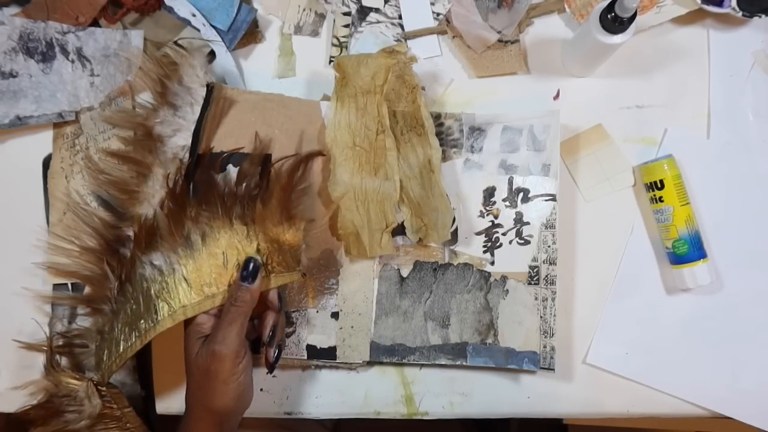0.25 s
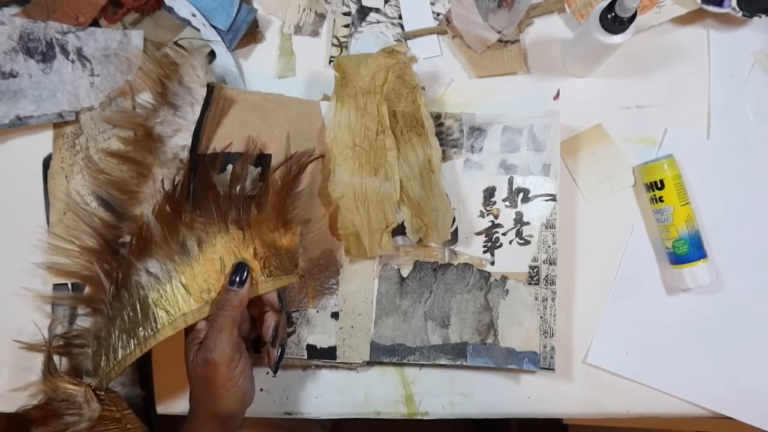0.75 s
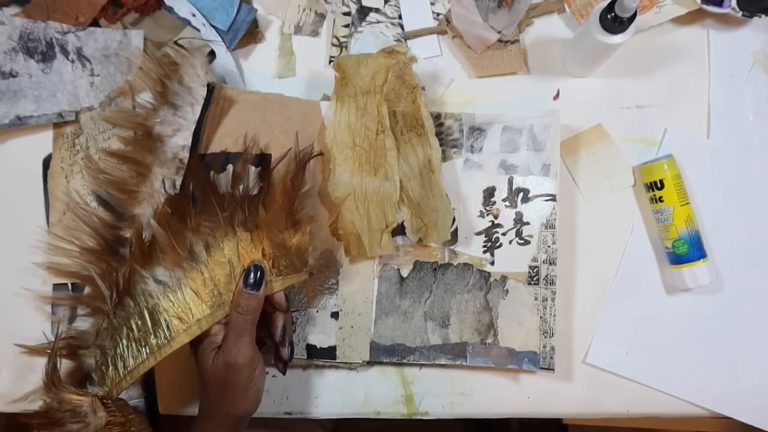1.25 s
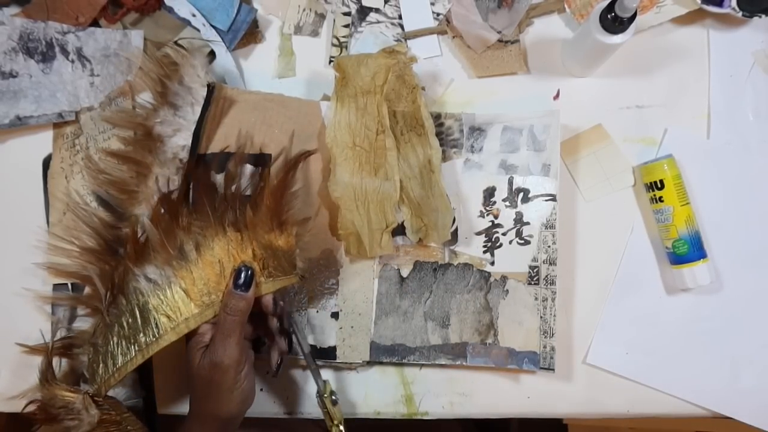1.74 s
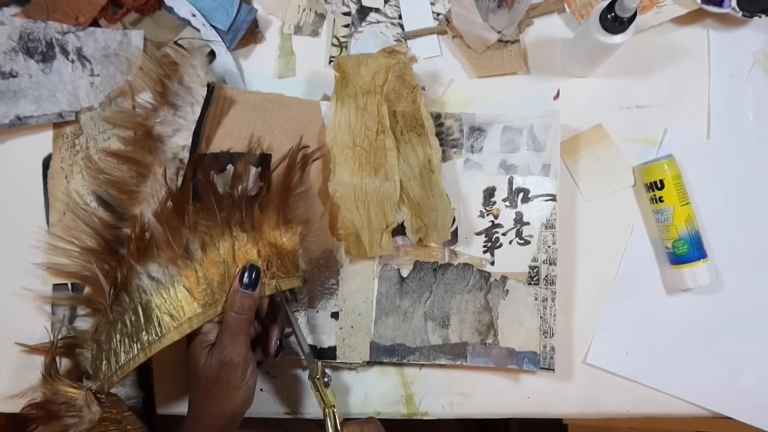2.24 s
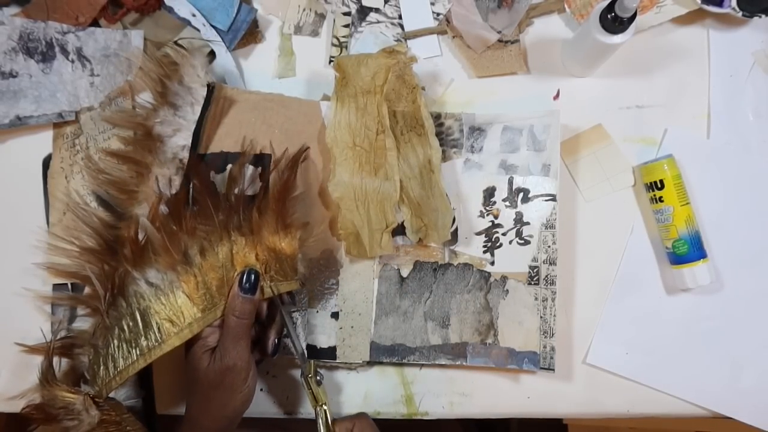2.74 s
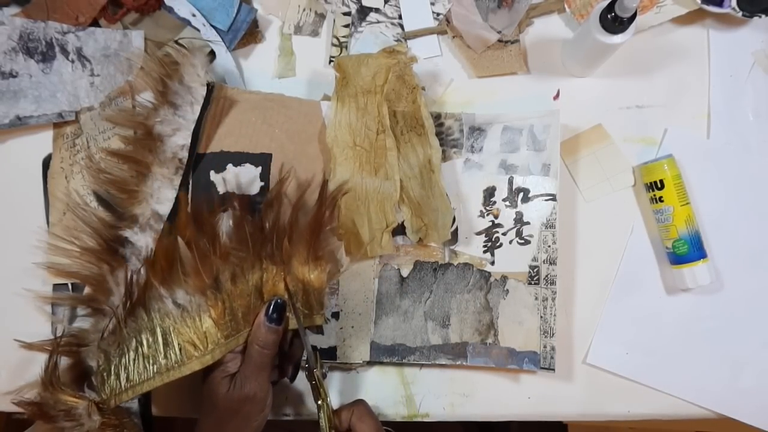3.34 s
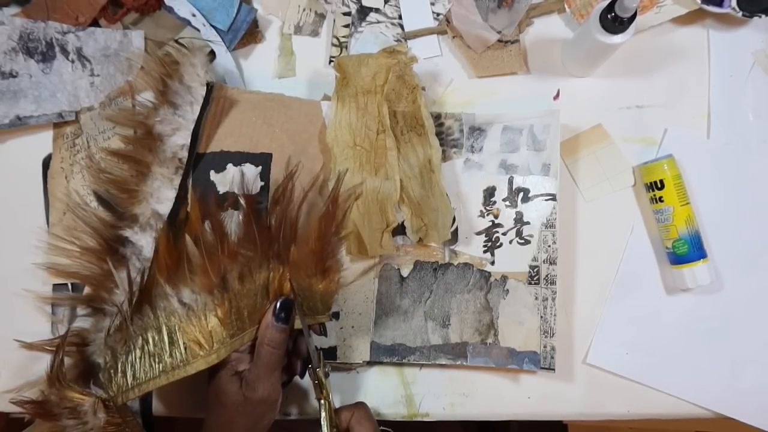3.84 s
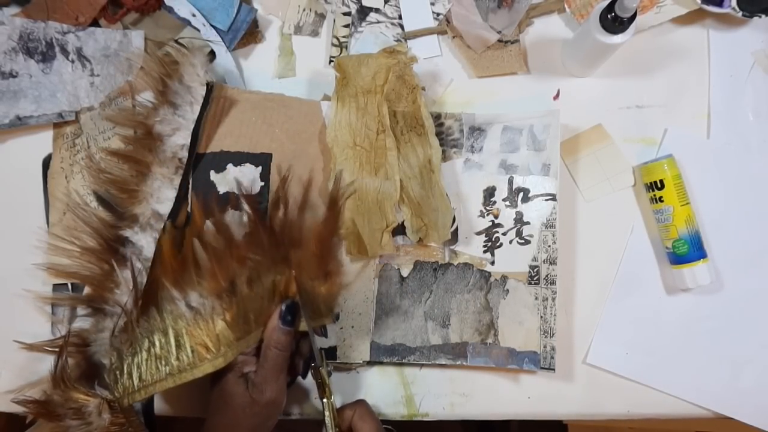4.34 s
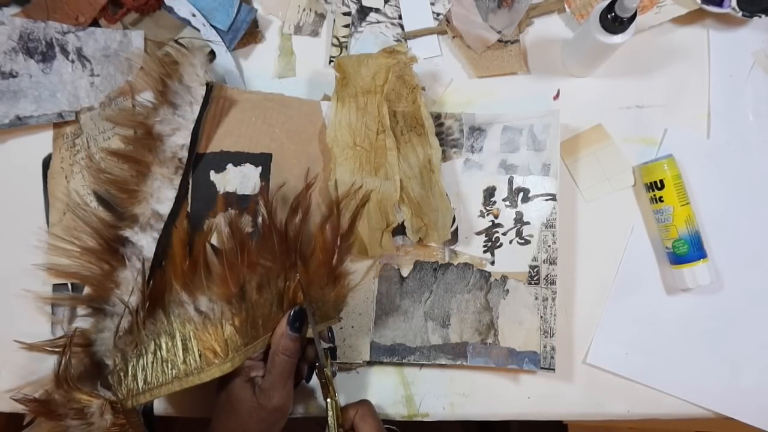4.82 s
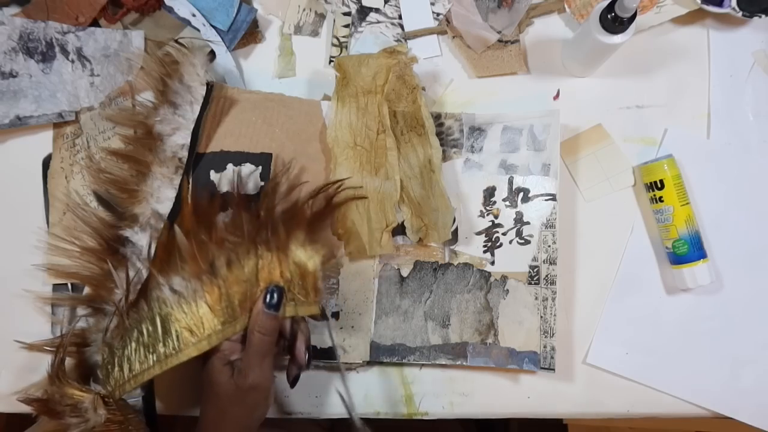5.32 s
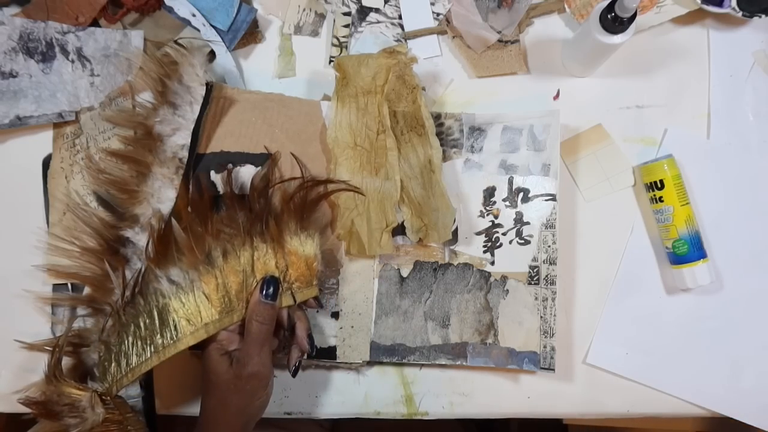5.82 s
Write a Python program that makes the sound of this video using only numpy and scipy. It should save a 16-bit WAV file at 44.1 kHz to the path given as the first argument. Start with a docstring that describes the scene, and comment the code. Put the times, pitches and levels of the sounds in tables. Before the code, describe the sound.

Scissors are picked out of clutter to the left, with a busy dry rattle, paper scrapes and light table knocks fading within a second. After a near-quiet gap, small steel ticks, a brief blade swish and soft handle clicks sound at centre as feather trim is cut. Finally the scissors drop at left with a loud woody clunk and short clatter. Steady low hum and faint hiss, close stereo microphones, small dry room.

```python
"""Clutter rattles at once on a craft table, to the left, as scissors are picked out over a mains hum and hiss.
Then straight below the microphones they snip a strip of feather trim, and are dropped back to the left.
Hum is sines; hiss, dragging and sliding are coloured noise; rattles are short noise bursts.
Table and handles are struck sets of modes; steel ticks are rough sines with a click. A faint room follows."""
import sys
import numpy as np
from scipy import signal
from scipy.fft import rfft, irfft, next_fast_len
from scipy.io import wavfile
from scipy.ndimage import uniform_filter1d

SR = 44100
rng = np.random.default_rng(int(sys.argv[2]) if len(sys.argv) > 2 else 0)


def transcribe(u):
    """Save the signal u as a 16-bit wav file named by the first command-line argument.

    u: samples, shape (n,) or (channels, n), limited to [-1, 1]; the rate is SR.
    q: integer samples, one column per channel.
    """
    v = np.clip(np.atleast_2d(u).T, -1, 1)
    q = np.round(v * 32767).astype(np.int16)
    wavfile.write(sys.argv[1], SR, q)


N = 267863  # samples

# Mains hum. Each row: frequency in Hz, mean rms level in dB.
HUM_TONES = [(120.0, -43), (430, -69)]
# Colour of the room hiss. Each row: frequency in Hz, relative density in dB per Hz.
HISS_COLOUR = [(20, -32), (40, -12.5), (65, -14.5), (95, -13), (146, -12.5), (200, -15), (301, -14.5),
               (434, -17.5), (527, -20.5), (1030, -23.5), (2500, -29), (5850, -36), (10000, -44.5),
               (14000, -50.5), (16000, -62)]
# How alike the hiss is at both microphones. Each row: frequency in Hz, left-right correlation (-1 to 1).
HISS_LIKENESS = [(60, 1), (130, 0.64), (290, -0.33), (640, -0.2), (1410, 0.05), (3100, 0.4), (6820, 0.44)]
# Decay of the room. Each row: frequency in Hz, time to fall 60 dB in seconds.
ROOM_DECAY = [(200, 0.42), (1000, 0.22), (4000, 0.28), (12000, 0.093)]
# Lead of the left microphone for the clutter. Each row: frequency in Hz, left over right in dB.
LEFT_LEAD = [(100, -1), (1300, 1.5), (2400, 3.5), (8000, 2)]
# Colour of dragging over paper. Each row: frequency in Hz, relative density in dB per Hz.
PAPER_COLOUR = [(80, -50), (400, -26), (1100, 1), (1900, 1.5), (2700, -5.5), (4500, -13), (9000, -22),
                (16000, -44)]
# Colour of the rumble in the table. Each row: frequency in Hz, relative density in dB per Hz.
RUMBLE_COLOUR = [(60, -4), (150, 2), (350, 4), (600, -4.5), (1200, -54.5)]
# Things dragged over paper. Each row is a stroke: start in seconds, length in seconds, level in dB,
# treble tilt in dB per octave (held within -6 and 6), level of the table rumble in dB.
DRAG_STROKES = [(.009, .02, -52, -8, -45), (.045, 0.12, -35, -5, -41), (.2, 0.022, -33, 4, -46),
                (0.252, 0.06, -44, -0.5, -53), (0.319, 0.067, -48, 6, -54), (0.492, 0.12, -43.5, 2.5, -50),
                (0.651, 0.055, -42.5, 2.5, -64), (0.724, 0.16, -42.5, 1.5, -54),
                (.945, 0.04, -47, -0.5, -51), (1.019, 0.047, -52, -1, -48), (5.746, 0.034, -40, -1.5, -46),
                (5.801, .12, -38.5, -2.5, -53), (5.94, .04, -56, 2, -66)]
# Average colour of the rattling clutter. Each row: frequency in Hz, relative density in dB per Hz.
CLUTTER_COLOUR = [(60, -45), (300, -18.5), (700, -12.5), (1300, -7.5), (2050, 4), (2600, -6), (3300, -15),
                  (4200, -11.5), (5500, -23), (10000, -29), (16000, -56)]
# Clutter rattling. Each row: crest in seconds, nominal crest level in dB,
# treble tilt in dB per octave, time to fall 60 dB in seconds, time constant of the rise in seconds.
RATTLE_EVENTS = [(.0413, -20.5, 4.5, 0.023, .0003), (.049, -24, -5, 0.047, .002),
                 (.0564, -19.5, 7, .05, .002), (.0775, -17, 4, .022, .001), (.0875, -15, 4, .03, .001),
                 (.1122, -10, 4, .02, .0003), (.1315, -18, 6.5, .037, .002), (.1454, -20, 4.5, 0.04, .001),
                 (.1533, -15.5, -2, .015, .001), (.166, -25.5, 2, 0.031, .002),
                 (.227, -17.5, 1, .014, .002), (.2539, -15, -.5, 0.033, .0008),
                 (.262, -18, -3, 0.059, .002), (.2719, -18, -3, .021, .002), (.489, -34, -1, 0.23, .004),
                 (.506, -33, 6, .072, .004), (.5796, -29.5, -5, .02, .0005), (.667, -30.5, 4, .044, .004),
                 (.7669, -24, -0.5, 0.033, .003), (.8103, -27.5, -1.5, .035, .002),
                 (.817, -25, -0.5, 0.046, .002), (.824, -28, -4, .025, .002), (.866, -33, -1, .033, .003),
                 (.878, -33, -4, .02, .003), (.934, -34, -1.5, 0.073, .001), (.957, -33.5, 16, 0.073, .003),
                 (.969, -31, -3.5, 0.034, .005), (1.027, -31.5, -1.5, 0.036, .003),
                 (5.7328, -38, 9, .03, .0008), (5.747, -31, -6, .074, .003), (5.761, -34, 2, .045, .004),
                 (5.777, -34, -3, 0.039, .002), (5.806, -16.5, 4.5, 0.014, .0003),
                 (5.853, -27, 6.5, 0.024, .001), (5.865, -21, -5, .028, .001),
                 (5.879, -18, -3, 0.012, .001), (5.897, -25.5, 3.5, 0.033, .001),
                 (5.902, -29, 6, 0.022, .001), (5.982, -41, -2, .033, .001), (6.037, -43.5, 6, 0.038, .002)]
# Modes of the table top with what lies on it. Each row: frequency in Hz, relative level in dB,
# time to fall 60 dB in seconds.
TABLE_MODES = [(70, -29, 0.092), (105, -11, 0.16), (140, -3, 0.14), (195, 0.5, 0.036), (289, 7.5, 0.056),
               (328, -1, 0.058), (426, 8, 0.055), (530, -26, 0.069), (626.4, -2.5, 0.19),
               (698.6, 8.5, 0.081), (784, -2.5, 0.14), (920, -9, 0.092), (930, -7, .1), (1090, -6, 0.032),
               (1316, -6.5, 0.077), (1452, -2, 0.061), (1542, 3.5, 0.07), (2160, -20, .06)]
# Blows on the table. Each row: start in seconds, peak in dB, frequency driven most in Hz,
# octaves from there to 6 dB less drive, decay constant of the contact chatter in seconds.
TABLE_BLOWS = [(0.039, -21.5, 306, 0.74, 0.0025), (.069, -22.5, 250, 0.91, 0.0031),
               (0.112, -23, 300, 1.6, 0.0065), (.144, -19, 202, 1.43, 0.0033),
               (.247, -18, 250, 0.65, 0.0066), (0.327, -32, 400, 0.22, 0.0043),
               (0.345, -25, 290, 0.78, 0.0079), (.581, -23.5, 330, 0.79, 0.008),
               (.765, -34.5, 300, 0.65, 0.0035), (0.809, -31, 250, 0.44, .006),
               (1.03, -39, 300, 0.86, 0.0051), (5.748, -33, 500, 2.1, 0.013),
               (5.8066, 0.3, 1050, 0.55, 0.00076), (5.813, -3.5, 280, 0.6, 0.0017),
               (5.819, -12.5, 850, 0.54, 0.0099), (5.856, -9.5, 168, 0.61, 0.0019),
               (5.883, -15, 130, 1.3, 0.0017), (5.9369, -20, 550, 0.44, 0.0037),
               (5.941, -11.5, 410, 0.35, 0.0041), (5.965, -21.5, 332, 0.31, 0.0073)]
# Colour of blades on feathers, and of the steel click. Each row: frequency in Hz, relative density in dB per Hz.
FEATHER_COLOUR = [(150, -14), (700, -5.5), (2000, 1.5), (4000, 1.5), (8000, -1), (12000, -5.5),
                  (16000, -16)]
# Blades and feathers sliding. Each row is a stroke: start in seconds, length in seconds, level in dB,
# treble tilt at the start in dB per octave (held within -6 and 6).
SLIDE_STROKES = [(1.561, .008, -51.5, -2.5), (1.909, .004, -50, -7), (2.095, .004, -50.5, -4.5),
                 (3.121, 0.11, -57, -5.5), (3.425, 0.014, -55.5, -4.5), (4.11, .01, -63, 1),
                 (4.38, .055, -48, -.8), (4.971, .004, -50, -10), (5.013, 0.0071, -50.5, -4.5),
                 (5.123, 0.0035, -46, -9), (5.165, 0.034, -54, -3), (5.445, .01, -57.5, -1),
                 (5.501, .01, -50.5, -4)]
# Open blades pushed in along the trim. Each row is a moment: time in seconds, level in dB,
# treble tilt in dB per octave (held within -6 and 6).
ENTRY_PATH = [(2.9, -61, 7), (2.938, -47, 7.5), (2.97, -42, -0.5), (2.99, -45.5, -1), (3.03, -53, 3),
              (3.07, -75, 0)]
# Resonances of that push. Each row: frequency in Hz, width in Hz, relative level in dB.
ENTRY_RESONANCES = [(1320, 670, -4.5), (2200, 780, 1.5), (3240, 740, 7), (3970, 1400, -1), (5530, 1700, -5),
                    (8900, 4400, -23)]
# Modes of the handles. Each row: frequency in Hz, relative level in dB, time to fall 60 dB in seconds.
HANDLE_MODES = [(1340, 6.5, 0.043), (1460, 5, 0.05), (1900, 1.5, 0.022), (2230, 3, 0.017),
                (3350, -3.5, 0.012), (4400, -16, .03)]
# Handles meeting. Each row: start in seconds, peak in dB, tilt of the drive about 2 kHz in dB per octave.
HANDLE_CLOSINGS = [(3.6192, -46, 3), (4.4204, -29, 9), (4.446, -39.5, -2), (5.0164, -54, 2),
                   (5.1183, -41, 2), (5.4974, -43, 10)]
# Steel ticking at pivot and edges. Each row: start in seconds, nominal level in dB,
# frequency of the ring in Hz, click against ring in dB.
STEEL_TICKS = [(0.5773, -28.5, 6950, -3), (0.578, -30, 10940, -7), (1.0258, -32.5, 9000, 2),
               (1.512, -59, 11000, 0), (2.1365, -55, 11000, 2), (3.612, -42, 7980, -5),
               (3.6185, -34.5, 8350, 0), (3.620, -47, 5800, -9), (3.6372, -43, 8980, 2),
               (3.6583, -49, 8850, 8.5), (3.773, -44.5, 8600, 7.5), (4.960, -30.5, 7580, 10),
               (4.961, -36, 5570, -15), (4.9764, -45, 9000, -13), (5.301, -50, 5800, 8),
               (5.4114, -50, 5800, -12), (5.4311, -49, 7070, -10), (5.438, -48, 8300, -10),
               (5.449, -52, 11000, -5), (5.5555, -49, 12000, 9), (5.5555, -50, 6300, -4)]

HISS_DB, ROOM_DB = -50, -10
SIDE_LAG_S = 4.3e-5  # the right microphone hears the clutter this much later
LIFTED_S = 1.2  # the scissors leave the clutter
MIC_LOW_HZ, EDGE_HZ = 55.5, 15900
STROKE_ENDS_DB = -21  # every stroke swells from and dies to this far under its level
DRAG_RISE_S, DRAG_FALL_S, DRAG_SAG_DB = .008, 0.037, -2.5
SLIDE_RISE_S, SLIDE_FALL_S = .025, 0.039
SLIDE_DULLS_DB = -3  # change of tilt in dB per octave, as the stroke slows
TICK_T60_S, CLICK_T60_S, TICK_RISE_S = 0.022, 0.0088, 0.0011


def amp(db):
    """Decibels to gain."""
    return 10 ** (np.asarray(db) / 20)


def evened(x):
    """Scales to rms 1."""
    return x / np.sqrt(np.mean(x ** 2) + 1e-20)


def read(points, hz):
    """Value of a table on a log-frequency axis."""
    f, value = np.transpose(points)
    return np.interp(np.log(hz + 1), np.log(f + 1), value)


def add(mix, s, sound):
    """Mixes a sound in at a time in seconds."""
    part = mix[round(s * SR):][:len(sound)]
    part += sound[:len(part)]


def coloured(x, points, tilt_db=0):
    """Filters by a spectrum tilted about 2 kHz; the tilt stops growing below 200 Hz."""
    hz = np.fft.rfftfreq(len(x), 1 / SR)
    tilt = tilt_db * np.log2(np.maximum(hz, 200) / 2000)
    return irfft(rfft(x) * amp(read(points, hz) + tilt), len(x))


def stroke(start, length, level_db, tilt_db, rise, fall, sag_db=0, dulls_db=0):
    """Swell, hold and release of one movement as rows of seconds, level in dB, tilt in dB per octave."""
    end = start + length
    end_db, end_tilt = level_db + sag_db, tilt_db + dulls_db
    return [(start - rise, level_db + STROKE_ENDS_DB, tilt_db), (start, level_db, tilt_db),
            (end, end_db, end_tilt), (end + fall, end_db + STROKE_ENDS_DB, end_tilt)]


def friction(rows, points, grain_db):
    """Rubbing as dense grains of uneven size, blended between a dull and a bright colour."""
    s, level_db, tilt = np.transpose(rows)
    t = np.arange(s[0], s[-1], 1 / SR)
    clumps = evened(uniform_filter1d(rng.standard_normal(len(t)), size=60))
    grains = rng.standard_normal(len(t)) * amp(grain_db * clumps)
    dull_sound = evened(coloured(grains, points, -6))
    bright_sound = evened(coloured(grains, points, 6))
    bright = np.clip(.5 + np.interp(t, s, tilt) / 12, 0, 1)
    x = (1 - bright) * dull_sound + bright * bright_sound
    x /= np.sqrt(uniform_filter1d(x ** 2, size=2000) + 1e-9)  # steady before the level is drawn
    return s[0], x * amp(np.interp(t, s, level_db)) * signal.windows.tukey(len(t), .08)


def struck(modes, weight, chatter, sign=1):
    """A body rung by a contact that lands, then chatters; modes are detuned slightly at random each time. Peak 1."""
    t = np.arange(SR // 4) / SR
    push = 0.14 * rng.standard_normal(2048) * np.exp(-t[:2048] / chatter)
    push[0] = 1
    detune = 1 + 0.013 * rng.standard_normal(len(modes))
    detune *= sign ** np.arange(len(modes))  # sign -1: neighbours start opposed, so the ring swells after contact
    ring = np.zeros(len(t))
    for (hz, db, t60), ratio in zip(modes, detune):
        ring += amp(db - 60 * t / t60 + weight(hz)) * np.sin(2 * np.pi * hz * ratio * t)
    sound = signal.fftconvolve(push, ring / abs(ring).max())
    return sound / abs(sound).max()


def hum():
    """Mains hum as steady sines, the same at both microphones, wavering a little in level."""
    t = np.arange(N) / SR
    waver = evened(sum(np.sin(2 * np.pi * (f * t + rng.random())) for f in np.geomspace(.3, 6, num=20)))
    out = np.zeros(N)
    for hz, db in HUM_TONES:
        tone = np.sqrt(2) * np.sin(2 * np.pi * (hz * t + rng.random()))  # rms 1
        out += amp(db + .45 * waver) * tone
    return out


def hiss():
    """Diffuse room noise, faintly patchy, with a likeness between the microphones set by frequency."""
    frames, hz = N // 512 + 5, np.fft.rfftfreq(2048, 1 / SR)
    a, b, c, d, patches = rng.standard_normal((frames, 1025, 5)).T
    patches = uniform_filter1d(patches, size=30, axis=0)  # across frequency
    patches = evened(uniform_filter1d(patches, size=6, axis=1))  # across time
    same = np.clip(read(HISS_LIKENESS, hz), -1, 1)[:, None]
    left, other = a + 1j * b, c + 1j * d
    z = np.array([left, same * left + np.sqrt(1 - same ** 2) * other])
    z *= amp(read(HISS_COLOUR, hz)[:, None] + .8 * patches)
    return amp(HISS_DB) * evened(signal.istft(z, nperseg=2048, noverlap=1536)[1][:, :N])


def room(x):
    """Sparse reflections as taps of random sign, each band dying at its own speed."""
    taps = np.zeros((2, SR // 2))
    slots = np.arange(120, SR // 2 - 20, 20)
    at = slots + rng.integers(0, 20, (2, len(slots)))
    np.put_along_axis(taps, at, rng.choice([-1., 1.], at.shape), 1)
    hz, t, z = signal.stft(taps, SR, nperseg=256)
    tail = signal.istft(z * amp(-60 * t / read(ROOM_DECAY, hz)[:, None]), SR, nperseg=256)[1]
    tail = tail + 0.91 * tail[::-1]  # each side shares most of the other's reflections
    return signal.fftconvolve(x[None], tail / np.linalg.norm(tail[0]), axes=1)[:, :N]


def dragging():
    """Things dragged over paper: friction grains, with a low rumble passed into the table."""
    out = np.zeros(N)
    for s, length, db, tilt_db, rumble_db in DRAG_STROKES:
        scrape = stroke(s, length, db, tilt_db, DRAG_RISE_S, DRAG_FALL_S, DRAG_SAG_DB)
        rumble = stroke(s, length, rumble_db, 0, DRAG_RISE_S, DRAG_FALL_S, DRAG_SAG_DB)
        add(out, *friction(scrape, PAPER_COLOUR, grain_db=3))
        add(out, *friction(rumble, RUMBLE_COLOUR, grain_db=-0.8))
    return out


def rattling():
    """Clutter rattling: noise bursts that rise quickly and die exponentially."""
    out, t = np.zeros(N), np.arange(4096) / SR
    after = t - .02  # the crest falls 20 ms into the burst
    hz = np.r_[60, np.linspace(300, 16000, num=31)]
    for s, db, tilt_db, t60, rise in RATTLE_EVENTS:
        # each burst's colour is varied at random around the average clutter colour
        varied = np.c_[hz, read(CLUTTER_COLOUR, hz) + 2.5 * rng.standard_normal(32)]
        burst = coloured(rng.standard_normal(len(t)), varied, tilt_db)
        shape = np.where(after < 0, np.exp(np.minimum(after, 0) / rise), amp(-60 * after / t60))
        shape_rms = np.sqrt(np.mean(shape ** 2))
        add(out, s - .02, amp(db - 3) * evened(burst * shape) * shape_rms)
    return out


def blows():
    """Blows on the table top, each contact driving the modes around one frequency."""
    out = np.zeros(N)
    for s, db, centre_hz, spread, chatter in TABLE_BLOWS:
        add(out, s, amp(db) * struck(TABLE_MODES, lambda hz: -6 * (np.log2(hz / centre_hz) / spread) ** 2, chatter))
    return out


def ticks():
    """Steel ticking: a rough narrow ring, its phase wandering, on top of a wide click."""
    out, t = np.zeros(N), np.arange(4096) / SR
    for s, db, ring_hz, click_db in STEEL_TICKS:
        wobble = np.cumsum(rng.standard_normal(len(t))) * 0.21
        ring = amp(-60 * t / TICK_T60_S) * np.sin(2 * np.pi * ring_hz * t + wobble)
        noise = evened(coloured(rng.standard_normal(len(t)), FEATHER_COLOUR))
        click = noise * amp(click_db - 60 * t / CLICK_T60_S)
        add(out, s, amp(db) * (ring + click) * (1 - np.exp(-t / TICK_RISE_S)))
    return out


def closings():
    """Handles meeting: a chattering contact rings their modes."""
    out = np.zeros(N)
    for s, db, tilt_db in HANDLE_CLOSINGS:
        knock = struck(HANDLE_MODES, lambda hz: tilt_db * np.log2(hz / 2000), chatter=0.0035, sign=-1)
        add(out, s, amp(db) * knock)
    return out


def entry():
    """Open blades pushed in along the trim: friction coloured by a sum of resonances."""
    out, hz = np.zeros(N), np.geomspace(500, 16000, num=200)
    power = sum(amp(db) ** 2 / (1 + (2 * (hz - f) / width) ** 2) ** 2 for f, width, db in ENTRY_RESONANCES)
    add(out, *friction(ENTRY_PATH, np.c_[hz, 10 * np.log10(power)], grain_db=1.2))
    return out


def slides():
    """Blades and feathers sliding: friction strokes that dull as they slow."""
    out = np.zeros(N)
    for s, length, db, tilt_db in SLIDE_STROKES:
        path = stroke(s, length, db, tilt_db, SLIDE_RISE_S, SLIDE_FALL_S, dulls_db=SLIDE_DULLS_DB)
        add(out, *friction(path, FEATHER_COLOUR, grain_db=2.0))
    return out


def from_the_left(x):
    """Sound from the side reaches the left microphone first and, but for the bass, louder."""
    size = next_fast_len(N + 512)
    hz = np.fft.rfftfreq(size, 1 / SR)
    half = amp(read(LEFT_LEAD, hz) / 2) * np.exp(1j * np.pi * hz * SIDE_LAG_S)  # half the lead to each side
    return irfft(rfft(x, size) * np.array([half, 1 / half]), size)[:, :N]


def scene():
    """Clutter on the left, cutting straight below; the ticks move from one to the other at the lift."""
    steel, lifted = ticks(), np.arange(N) > LIFTED_S * SR
    side = dragging() + rattling() + blows() + steel * ~lifted
    centre = slides() + entry() + closings() + steel * lifted
    return from_the_left(side) + centre + amp(ROOM_DB) * room(side + centre) + hum() + hiss()


def record(dry):
    """The microphones lose the deep bass; band limit and full scale."""
    heard = signal.sosfilt(signal.butter(2, MIC_LOW_HZ, "high", fs=SR, output="sos"), dry)
    edge = signal.firwin(255, EDGE_HZ, window=("kaiser", 9), fs=SR)
    return np.clip(signal.oaconvolve(heard, edge[None], "same"), -1, 1)


dry = scene()
out = record(dry)
transcribe(out)
```